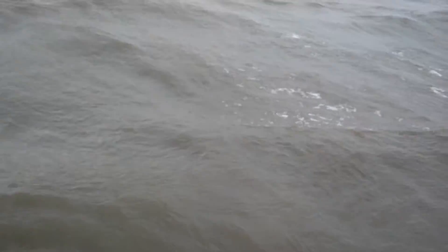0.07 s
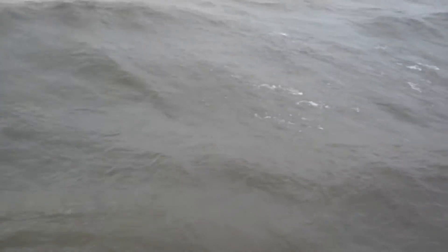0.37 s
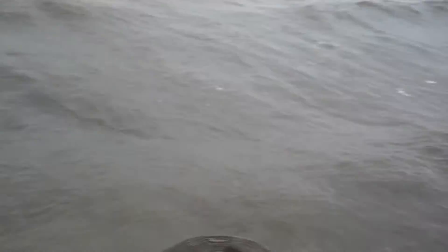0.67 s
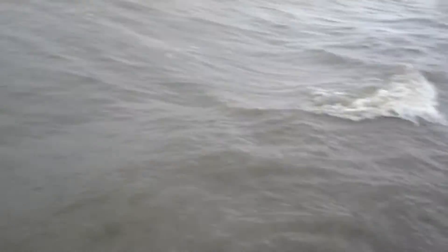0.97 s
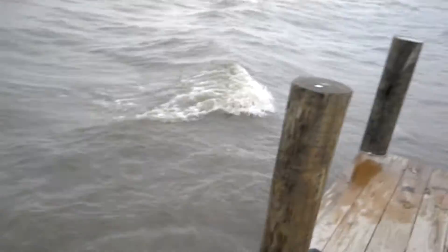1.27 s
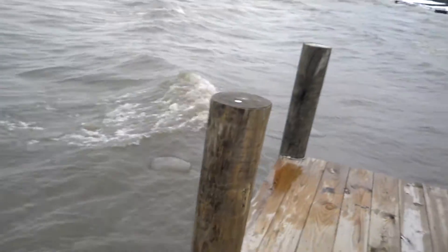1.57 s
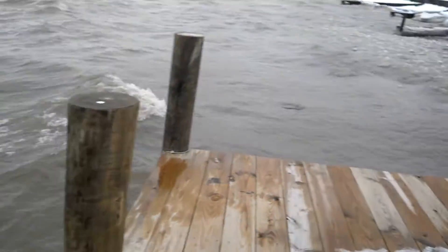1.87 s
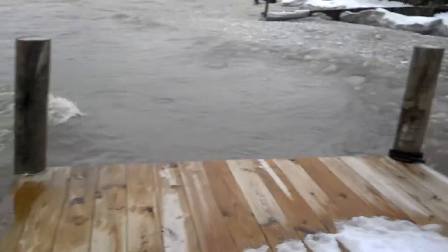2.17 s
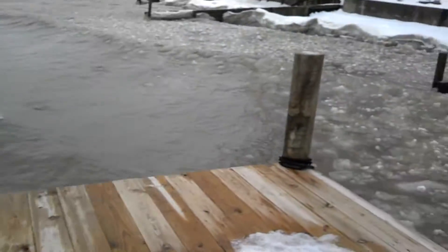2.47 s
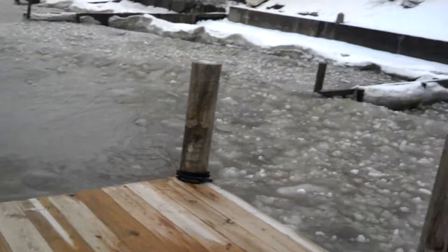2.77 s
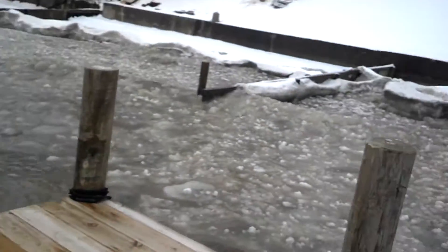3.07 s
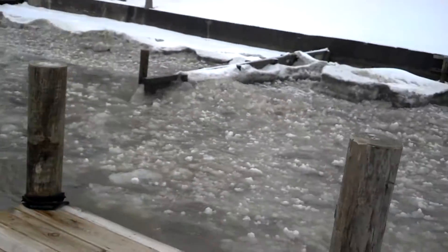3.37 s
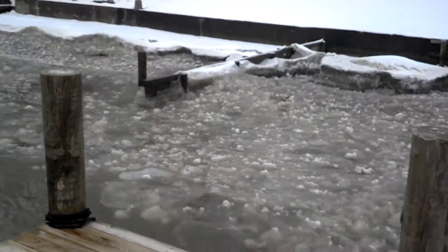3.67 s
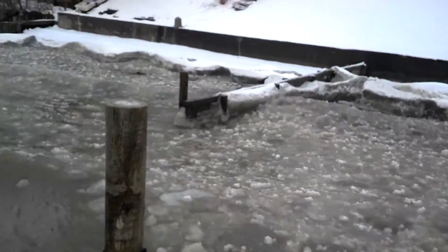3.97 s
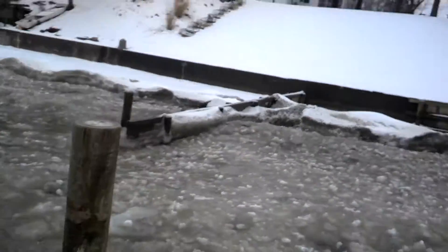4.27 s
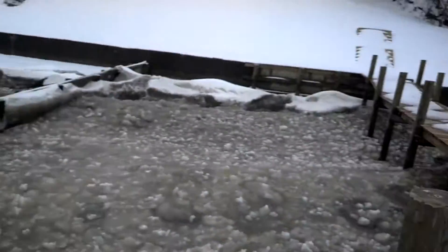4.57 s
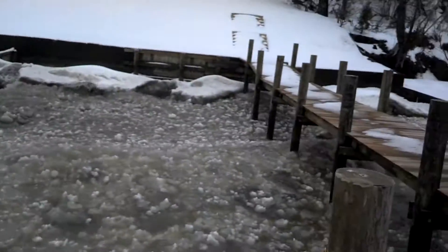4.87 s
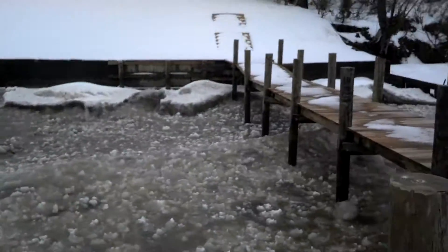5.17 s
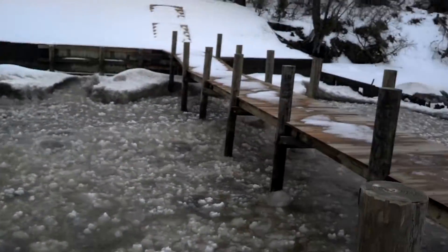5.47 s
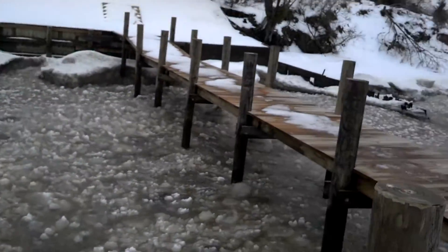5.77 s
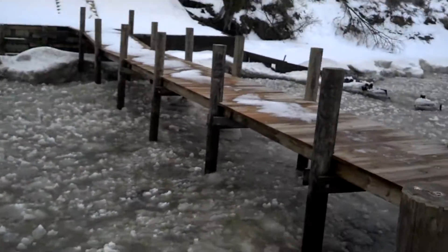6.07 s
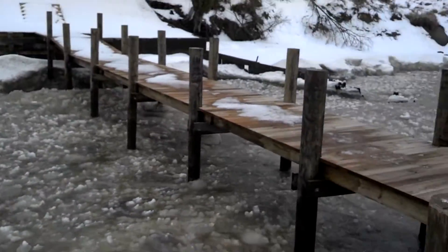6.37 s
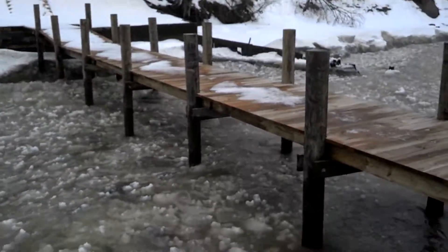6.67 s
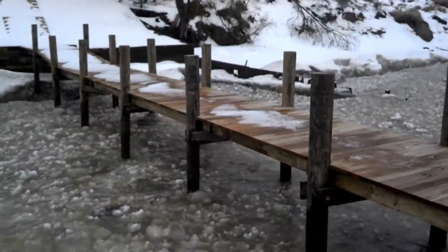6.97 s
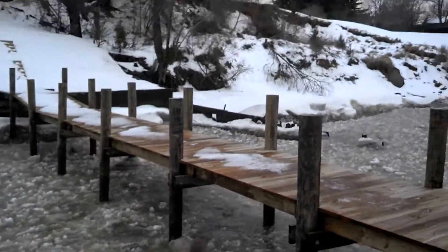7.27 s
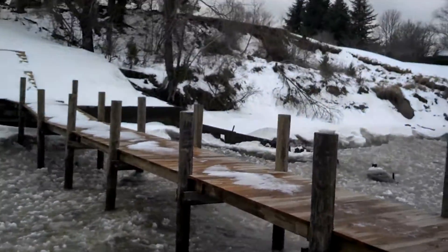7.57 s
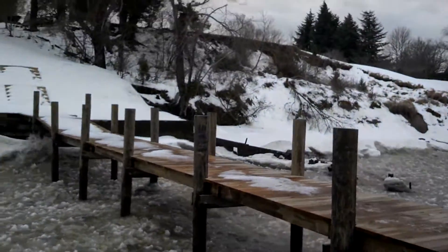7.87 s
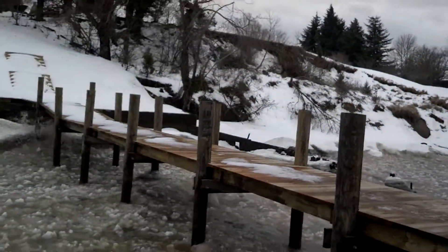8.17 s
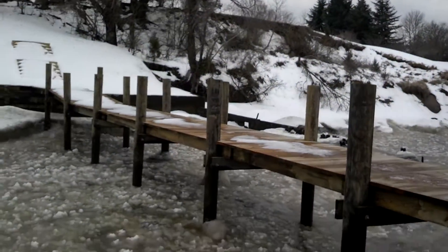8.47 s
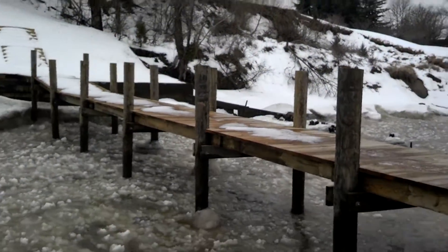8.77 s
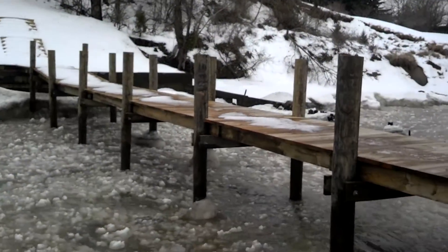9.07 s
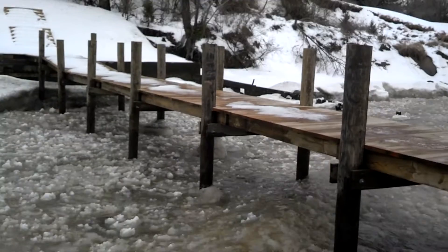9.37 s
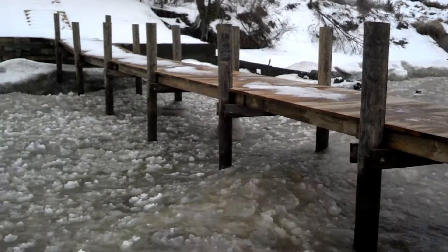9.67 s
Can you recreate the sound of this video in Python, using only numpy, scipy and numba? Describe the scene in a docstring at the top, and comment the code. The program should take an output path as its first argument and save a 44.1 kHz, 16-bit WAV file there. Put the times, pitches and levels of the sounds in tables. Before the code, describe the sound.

Wind buffets the microphone, then eases to let through the sloshing and fine crackle of waves in icy slush.

```python
"""Slushy waves at a windy dock

Choppy water washes slushy ice round a wooden dock: a rush of tiny collisions and bubbles.
Eddies (swirls of air) rumble and thump on a hand-held camera's two microphone openings, or ports,
and gusts hiss across its grille. The camera turns itself down at each hard buffet and recovers
slowly; it widens its stereo by subtracting each port from the other."""
import sys
import numpy as np
from scipy import signal
from scipy.fft import rfft, irfft, next_fast_len
from scipy.io import wavfile
from scipy.ndimage import uniform_filter1d, map_coordinates
from numba import njit

SR = 44100
rng = np.random.default_rng(int(sys.argv[2]) if len(sys.argv) > 2 else 0)


def materialize(psi):
    """Save the field psi as 16-bit PCM at rate SR to the path in sys.argv[1].

    A 1-D psi becomes a single channel; in a 2-D psi each row is a channel.
    """
    bounded = np.clip(np.atleast_2d(psi).T, -1, 1)
    quanta = np.round(bounded * 32767).astype(np.int16)
    wavfile.write(sys.argv[1], SR, quanta)


N = 437913
TIME, FREQ = np.arange(N) / SR, np.fft.rfftfreq(N, 1 / SR)


def from_db(db):
    """Turn decibels into a number to multiply by."""
    return 10 ** (np.asarray(db) / 20)


def normalise(x):
    """Scale a sound so its average power is 1."""
    return x / np.sqrt(np.mean(x ** 2))


def filtered(x, gain):
    """Turn each frequency in FREQ up or down by its gain."""
    size = next_fast_len(N)
    gain = np.interp(np.fft.rfftfreq(size, 1 / SR), FREQ, gain)
    return irfft(rfft(x, size) * gain, size)[..., :N]


def tone_curve(points):
    """Join (pitch_hz, level_db) points into gains for a filter."""
    hz, db = np.transpose(points)
    return from_db(np.interp(np.log(FREQ + 1), np.log(hz), db))


def band(hz, width_hz, steepness=2):
    """Filter gains that keep the frequencies near one pitch."""
    return 1 / (1 + (2 * (FREQ - hz) / width_hz) ** steepness)


def muffle(x, above_hz):
    """Keep the lows and fade out the highs."""
    return filtered(x, 1 / (1 + (FREQ / above_hz) ** 4))


def wobble(per_s):
    """A smooth random drift, about 1 in size, with per_s new values a second."""
    hold = int(SR / per_s)
    steps = np.repeat(rng.standard_normal(N // hold + 1), hold)
    return normalise(uniform_filter1d(uniform_filter1d(steps, hold), hold)[:N])


def hump(peak_s, half_length_s):
    """A smooth rise to 1 and fall back."""
    return np.exp(-np.minimum(((TIME - peak_s) / half_length_s) ** 2, 50))


def swells(rows):
    """Loudness over time from (peak_s, half_length_s, level_db) humps; their powers add."""
    return np.sqrt(sum((from_db(db) * hump(at, half_s)) ** 2 for at, half_s, db in rows))


def scatter(times, sounds):
    """Add up short sounds (one per row), each centred on its time."""
    size = sounds.shape[1]
    where = (times * SR).astype(int)[:, None] + np.arange(size)
    return np.bincount(where.ravel(), sounds.ravel(), N + size)[size // 2:size // 2 + N]


def from_all_sides(pair, right_late_s, spacing_m=0.12, blur_hz=1300, sound_m_per_s=343):
    """Spread two unrelated sounds over the ports; only waves longer than the gap reach both alike."""
    likeness = np.sinc(2 * FREQ * spacing_m / sound_m_per_s) / (1 + (FREQ / blur_hz) ** 2)
    common = filtered(pair[0], np.sqrt(1 + likeness))
    apart = filtered(pair[1], np.sqrt(1 - likeness))
    delay = np.exp(-2j * np.pi * FREQ * right_late_s)  # the open water lies a little to the left
    return np.array([common + apart, filtered(common - apart, delay)])


def bubbles(low_hz, high_hz, ring_cycles, spread_db, count, samples):
    """Bubbles and knocking ice ring briefly and die away: many faint, a few clear."""
    when, pitch, strength = rng.random((count, 3)).T
    hz = low_hz * (high_hz / low_hz) ** pitch
    cycles = hz[:, None] * np.arange(samples) / SR
    gain = from_db(-spread_db * np.log(np.maximum(strength, np.exp(-4)))) * hz
    rings = gain[:, None] * np.sin(2 * np.pi * cycles) * np.exp(-cycles / ring_cycles)
    return normalise(scatter(when * N / SR, rings))


# The tone of water and slush, from bass to treble: pitch_hz, relative_db
WATER_TONE = [(40, -4.5), (130, 3), (280, 2.5), (420, -2.5), (600, -6), (900, -9.5), (1300, -15.5),
              (1900, -12.5), (2700, -16), (4200, -23), (6500, -27), (10000, -31.5), (15500, -30)]
# Waves that run into the slush: peak_s, half_length_s, slosh_lift_db, fizz_lift_db
SLUSH_WAVES = [(0.36, 0.31, 1.5, 2.5), (1.235, 0.41, 14, 1), (3.502, 1.3, 7.5, 7), (4.732, 0.33, 7.5, 6.5),
               (5.275, 0.19, 5, 7), (6.45, 1.2, 1.5, 2.5), (6.996, 0.03, 3.5, 3), (7.604, 0.05, 3, -0.5),
               (8.498, 0.24, 0, 4), (9.6, 1.1, 5, 0.5)]

def slush(calm_slosh_db=-33, calm_fizz_db=-31, split_hz=1500, swell_db=0.41, flicker_db=0.8):
    """Waves churn the ice: low gurgles and fine crackle over a smooth, far rush."""
    near = []
    for _ in range(2):
        gurgle = bubbles(189, 2387, ring_cycles=3.7, spread_db=2.0, count=3000, samples=900)
        crackle = bubbles(1910, 14260, ring_cycles=3.6, spread_db=1.0, count=14000, samples=80)
        near.append(from_db(-16.5) * gurgle + from_db(-8) * crackle)
    far = rng.standard_normal((2, N))
    water = from_all_sides(np.array(near) + far, right_late_s=0.00004)
    water = normalise(filtered(water, tone_curve(WATER_TONE)))
    slosh = muffle(water, split_hz)
    fizz = water - slosh
    slosh_db, fizz_db = calm_slosh_db, calm_fizz_db + flicker_db * wobble(25)
    for peak_s, half_length_s, slosh_lift_db, fizz_lift_db in SLUSH_WAVES:
        wave = hump(peak_s, half_length_s)
        slosh_db = slosh_db + slosh_lift_db * wave
        fizz_db = fizz_db + fizz_lift_db * wave
    return (slosh * from_db(slosh_db) + fizz * from_db(fizz_db)) * from_db(swell_db * wobble(8.3))


# How loud the hollow rush under the slush is: time_s, level_db
HOLLOW_LEVELS = [(0, -34.5), (2.4, -47), (3.6, -31), (5.35, -34), (5.8, -38), (6.35, -37.5), (6.95, -33),
                 (7.3, -42.5), (8.2, -40.5), (9.8, -46.5)]

def hollow_rush(pitch_hz=375, width_hz=200, flicker_db=2.5, wander=0.13):
    """The swell works under the slush; its low rush wanders in pitch as air pockets change size."""
    water = from_all_sides(rng.standard_normal((2, N)), right_late_s=0.00004, spacing_m=0.027)
    rush = filtered(water, band(pitch_hz, width_hz))
    position = np.cumsum(1 + wander * wobble(9))  # playing faster or slower bends the pitch
    rush = np.array([map_coordinates(side, [position], order=1, mode="mirror") for side in rush])
    level_db = np.interp(TIME, *np.transpose(HOLLOW_LEVELS))
    return normalise(rush) * from_db(level_db + flicker_db * wobble(14))


def eddies(times, gain, hz, pulse, samples=640):
    """Each swirl of air gives a port one short pulse of pressure, shorter when it is faster."""
    phase = 2 * np.pi * hz[:, None] * (np.arange(samples) - samples // 2) / SR
    return scatter(times, gain[:, None] * pulse(phase) * np.hanning(samples))


def graze(phase, roundness=0.13):
    """A small eddy brushes past: one swing between two opposite ones, duller if its core is round."""
    return (phase ** 2 - 1) / (1 + phase ** 2 / (1 + 2 * roundness)) ** (2 + roundness)


# Gusts of wind at the ports: peak_s, half_length_s, level_db
WIND_GUSTS = [(0.02, 0.2, -16), (0.47, 0.2, -14), (0.68, 0.048, -9.5), (0.77, 0.075, -9.5),
              (0.87, 0.046, -5), (0.975, 0.068, -1), (1.12, 0.098, -1), (1.28, 0.15, -2),
              (1.65, 0.54, -13.5), (2.2, 1, -24), (2.53, 0.094, -5), (2.86, 0.17, -11), (3.39, 0.19, -18.5),
              (4.25, 0.44, -30), (4.81, 0.055, -16), (5.53, 0.22, -21), (6.72, 0.27, -26.5),
              (7.06, 0.084, -25), (7.4, 0.27, -25.5), (7.53, 0.053, -16.5), (7.91, 0.12, -19),
              (8.2, 0.22, -25.5), (8.57, 0.07, -16), (9.13, 0.24, -24), (9.62, 0.23, -26)]

def wind_rumble(breeze_db=-40.5, clump_db=4.0, spread_db=2.0, calm_hz=92, calm_db=-25, count=5000):
    """A light breeze and its gusts sweep clumps of small eddies over one port."""
    times = rng.uniform(0, N / SR, count)
    strength, quickness = np.clip(rng.standard_normal((count, 2)), -2, 2).T
    wind = np.hypot(swells(WIND_GUSTS), from_db(breeze_db))
    wind_db = 20 * np.log10(wind) + clump_db * np.tanh(wobble(70))
    eddy_db = np.interp(times, TIME, wind_db) + spread_db * strength
    # the stronger the wind, the faster and brighter its eddies
    above_calm_db = np.maximum(eddy_db - calm_db, 0)
    hz = calm_hz * np.exp(0.024 * above_calm_db + 0.36 * quickness)
    return eddies(times, from_db(eddy_db) * rng.choice([-1, 1], count), hz, graze)


def strike(phase, roundness=1.94):
    """A hard eddy hits head-on: a quick push and an equal pull make a dry, round pop."""
    return phase * (phase ** 2 - 3) / (1 + phase ** 2 / (1 + 2 * roundness)) ** (3 + roundness)


# The tone of the wake, the churned air round a hard eddy: pitch_hz, relative_db
WAKE_TONE = [(60, -15), (250, 8), (480, 5), (750, -17), (1100, -10), (1700, -21), (2400, -23), (3500, -63),
             (8000, -72)]
# Hard eddies that hit one port: time_s, level_db, pitch_hz, wake_relative_db, port ("L" or "R")
HARD_EDDIES = [(0.027, 0, 254, -12, "R"), (0.046, -0.5, 133, -11, "R"), (0.0909, -3, 204, -23, "R"),
               (0.2374, -1, 175, -17, "R"), (0.2817, -4, 203, -13, "R"), (0.352, -7.5, 276, -15, "R"),
               (0.382, -3.5, 230, -8, "R"), (0.45, -8.5, 260, -8, "R"), (0.458, -4.5, 170, -3, "R"),
               (0.529, 2, 138, -15, "R"), (0.5966, -6.5, 308, -3.5, "R"), (0.606, -1.5, 124, -11, "R"),
               (0.782, 1, 310, -16, "R"), (0.837, 0.5, 150, -8, "R"), (0.872, 7, 221, -27, "L"),
               (0.924, 0.5, 300, -0.5, "L"), (0.973, 7, 280, -2.5, "L"), (0.989, 3, 350, -6, "L"),
               (1.002, 0, 300, -5, "L"), (1.157, 11, 282, -5, "L"), (1.198, 4.5, 300, -1, "R"),
               (1.298, -4, 280, -5, "L"), (1.426, 8, 380, -8, "R"), (1.4357, 4.5, 148, -17, "R"),
               (1.4448, 1, 180, -21, "R"), (1.624, -1, 316, -3.5, "R"), (1.823, 0, 130, -9, "R"),
               (2.193, -3.5, 80.4, -24, "L"), (2.27, -6, 84.6, -14.5, "R"), (2.399, 2, 85, -16, "R"),
               (2.431, 14, 115, -17, "R"), (2.4355, -2, 297, -10, "R"), (2.4562, 17.5, 267, -10.5, "R"),
               (2.4828, 19.5, 193, -11, "R"), (2.498, 2, 150, -27, "R"), (2.506, 6, 175, -19, "R"),
               (2.5248, 23.5, 187, -26, "R"), (2.545, 14, 180, -16, "R"), (2.57, 10, 221, -10, "R"),
               (2.614, 4.5, 176, -11, "R"), (2.746, 0, 150, -23, "R"), (2.776, -2.5, 191, 0, "R"),
               (2.888, 0, 145, -11, "L"), (2.92, 1.5, 159, -6, "L"), (2.976, -4, 180, -1, "L"),
               (3.377, -0.5, 144, -14, "L"), (3.406, -1, 89, -22, "L"), (4.828, 2, 121, -20, "L"),
               (5.381, -6, 160, -23, "R"), (5.435, -0.5, 140, -17, "R"), (5.486, -8.5, 145, -4, "R"),
               (5.525, -1.5, 159, -10, "R"), (5.5819, 1.5, 197, -13, "R"), (5.622, -9, 230, -13, "R"),
               (5.675, -7.5, 187, -9, "R"), (5.734, -11, 137, -17.5, "R"), (7.025, -8, 90, -10, "L"),
               (7.128, -7, 90, -15, "R"), (7.551, -4, 143, -17, "L"), (7.557, 3.5, 142, -11, "L"),
               (7.885, -7, 100, -12, "L"), (8.047, -2.5, 84, -12, "L"), (8.087, -7.5, 106, -8, "L"),
               (8.326, 0.5, 129, -10.5, "R"), (8.583, 1.5, 95, -14.5, "L"), (8.975, -3, 187, -15, "R"),
               (9.078, -7.5, 170, -9, "R"), (9.898, -1, 101, -14, "R")]

def wind_buffets(rise_s=0.0028, decay_s=0.0064, wake_lag_s=0.00047, split_hz=650, crack_hz=270):
    """Hard eddies strike a port and break up into churned air; slow ones thump, fast ones crack."""
    age_s = np.arange(-900, 900) / SR
    burst = np.exp(np.minimum(age_s / rise_s, -age_s / decay_s))
    ports = []
    for port in "LR":
        times, db, hz, wake_db = np.transpose([row[:4] for row in HARD_EDDIES if row[4] == port])
        air = normalise(filtered(rng.standard_normal(N), tone_curve(WAKE_TONE)))
        low_air = muffle(air, split_hz)
        bursts = from_db(db + wake_db)[:, None] * burst
        wake = low_air * scatter(times + wake_lag_s, bursts)
        crack = (air - low_air) * scatter(times + wake_lag_s, bursts * (hz[:, None] / crack_hz))
        ports.append(eddies(times, from_db(db), hz, strike) + wake + crack)
    return np.array(ports)


# Pitches at which the grille rings: pitch_hz, width_hz, relative_db
GRILLE_RINGS = [(12900, 1200, -8), (14400, 1300, -6.5)]
# Puffs of air that skim the grille: peak_s, half_length_s, level_db
GRILLE_PUFFS = [(0.08, 0.13, -42), (3.64, 0.023, -36), (7.25, 0.23, -33.5)]

def grille_hiss(flutter_db=1.5, broad_db=-19):
    """A puff of air skims the grille and hisses in its slots and hollows."""
    rings = sum(from_db(db) * band(hz, width_hz) for hz, width_hz, db in GRILLE_RINGS)
    hiss = normalise(filtered(rng.standard_normal((2, N)), rings + from_db(broad_db)))
    return hiss * swells(GRILLE_PUFFS) * from_db(flutter_db * wobble(30))


# Washes of water under the dock: peak_s, half_length_s, level_db
DOCK_WASHES = [(6.45, 0.54, -45.5), (8.25, 0.58, -41.5)]

def lapping(pitch_hz=790, width_hz=380, flicker_db=0.5):
    """Water runs between the posts of the dock with a mid-pitched wash."""
    water = from_all_sides(rng.standard_normal((2, N)), right_late_s=0.00009)
    wash = normalise(filtered(water, band(pitch_hz, width_hz, steepness=4)))
    return wash * swells(DOCK_WASHES) * from_db(-flicker_db * wobble(16))


# Hollows in the grille that whistle: pitch_hz, width_hz, level_db
GRILLE_HOLLOWS = [(1950, 270, -39.5), (4710, 1100, -47)]

def grille_whistle(peak_s=7.33, half_length_s=0.26, sag_per_s=0.27, waver=0.007):
    """The longest puff draws an airy whistle from the grille; it wavers and sinks as the air slows."""
    blown_s = np.clip(TIME - peak_s + half_length_s, 0, 2 * half_length_s)
    speed = 1 - sag_per_s * blown_s + waver * wobble(18)
    whistle = 0
    for hz, width_hz, db in GRILLE_HOLLOWS:
        air = normalise(filtered(rng.standard_normal((2, N)), band(0, width_hz)))
        tone = np.sin(2 * np.pi * np.cumsum(hz * speed) / SR)
        whistle = whistle + from_db(db) * air * tone
    return whistle * hump(peak_s, half_length_s)


def scene():
    """Water and wind together at the left and right ports."""
    water = slush() + hollow_rush() + lapping()
    wind = grille_hiss() + grille_whistle() + wind_buffets()
    return water + wind + np.array([wind_rumble(), wind_rumble()])


@njit
def ducking(excess_db, attack, recover_db, duck_db):
    """How far to turn down: rise quickly toward any excess, then sink steadily back to zero."""
    out = np.empty(len(excess_db))
    for i in range(len(excess_db)):
        if excess_db[i] > duck_db:
            duck_db += attack * (excess_db[i] - duck_db)
        else:
            duck_db = max(duck_db - recover_db, 0.)
        out[i] = duck_db
    return out


def gain_control(ports, limit_db=-7, attack_s=0.00064, recover_db_per_s=8.5, start_duck_db=11.0):
    """A hard buffet turns both sides down at once; the water then creeps back over seconds."""
    excess_db = 20 * np.log10(np.abs(ports).max(axis=0) + 1e-9) - limit_db
    attack = 1 - np.exp(-1 / (attack_s * SR))
    # an earlier gust has already turned the sound down at the start
    return ports * from_db(-ducking(excess_db, attack, recover_db_per_s / SR, start_duck_db))


def overload(x, ceiling=0.66):
    """The camera's input rounds off the strongest peaks, which makes them crack."""
    return ceiling * np.tanh(x / ceiling)


def bass_cut(x, hz, q):
    """Remove the deep bass; the filter rings briefly after a thump, longer with a higher q."""
    w = 2 * np.pi * hz
    return signal.lfilter(*signal.bilinear([1, 0, 0], [1, w / q, w * w], SR), x)


def record(dry, delay_samples=16, top_hz=15480):
    """The camera tames loud peaks, widens the stereo, then trims the deep bass and highest treble."""
    ports = overload(gain_control(dry))
    other_port_late = np.pad(ports[::-1], ((0, 0), (delay_samples, 0)))[:, :N]
    left, right = ports - other_port_late
    trimmed = np.array([bass_cut(left, hz=110.7, q=1.366), bass_cut(right, hz=108.7, q=1.365)])
    treble_cut = signal.ellip(10, 0.2, 80, top_hz, fs=SR, output="sos")
    return signal.sosfilt(treble_cut, trimmed)


dry = scene()
out = record(dry)
materialize(out)
```